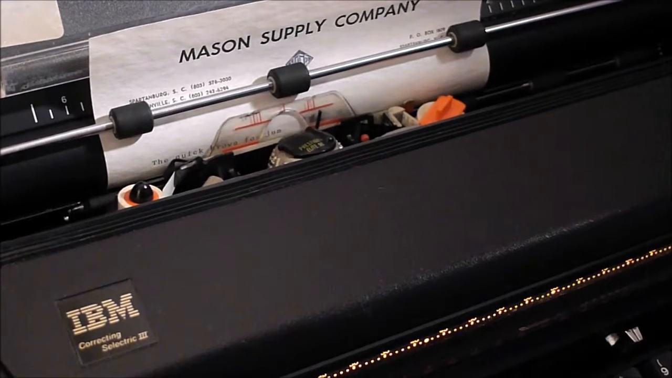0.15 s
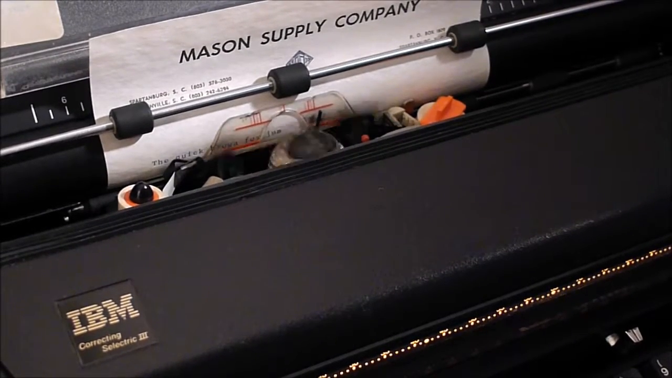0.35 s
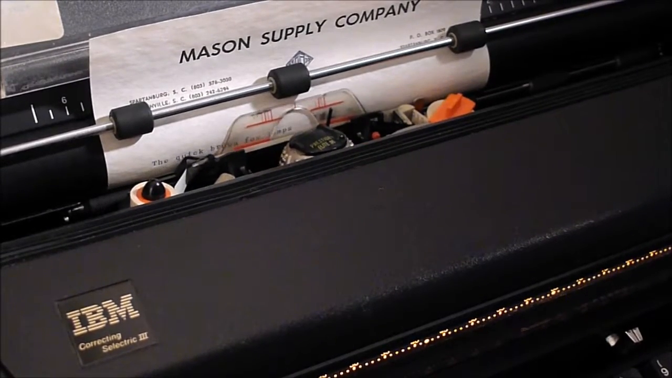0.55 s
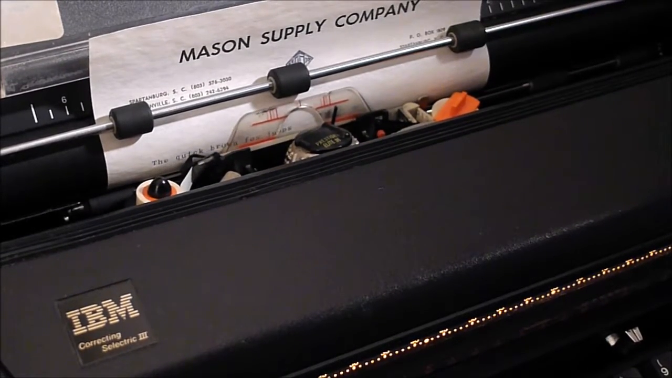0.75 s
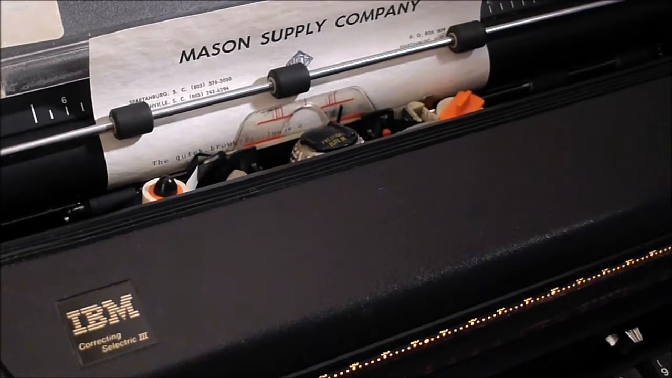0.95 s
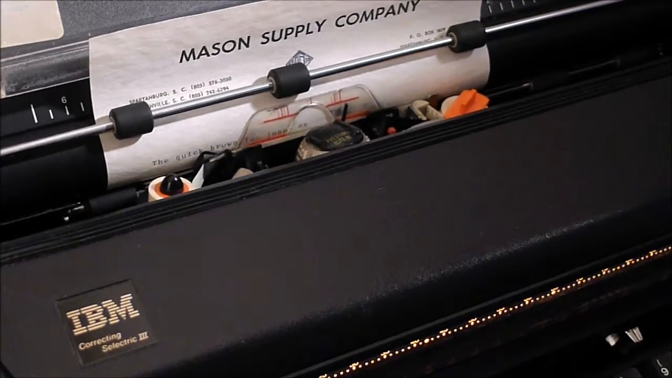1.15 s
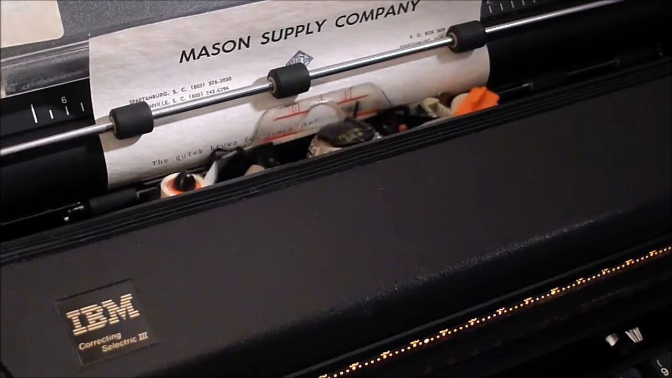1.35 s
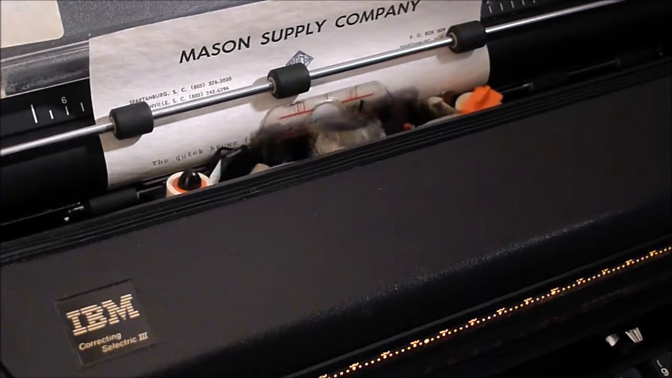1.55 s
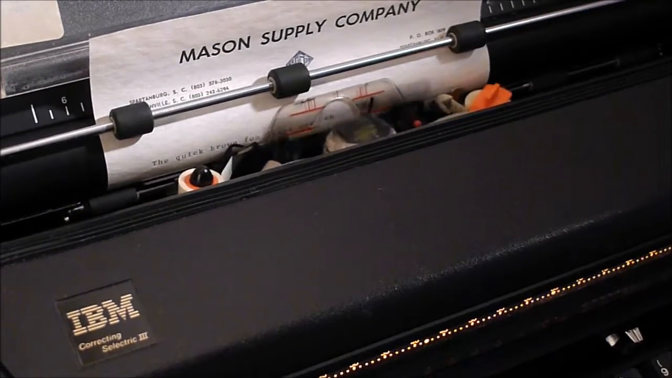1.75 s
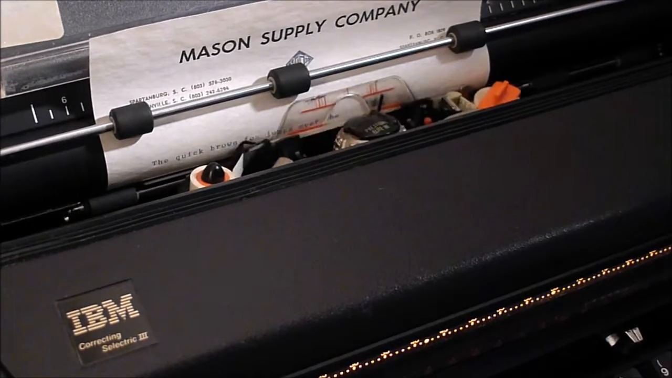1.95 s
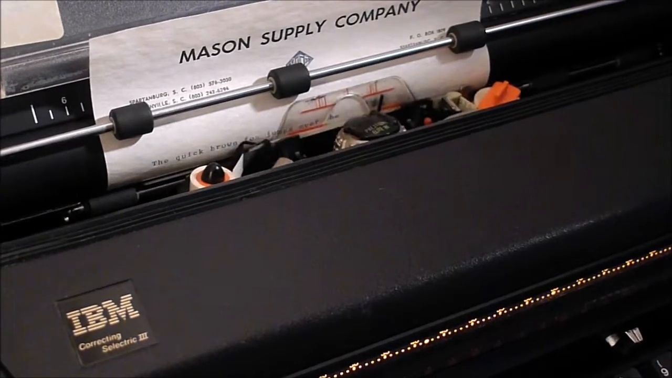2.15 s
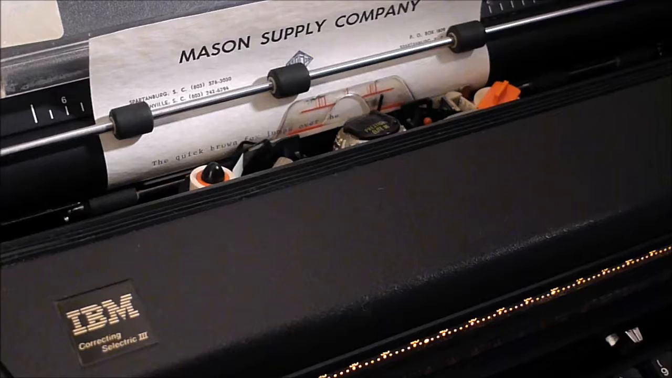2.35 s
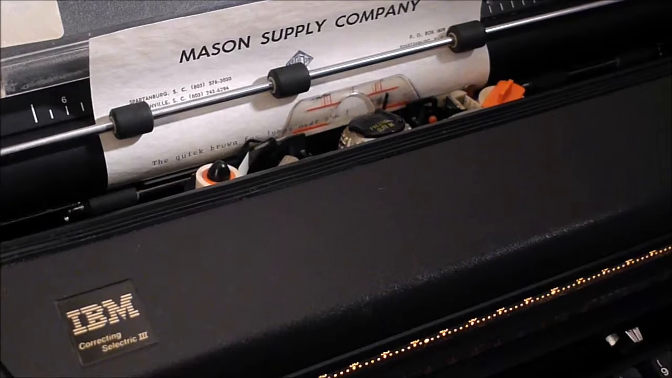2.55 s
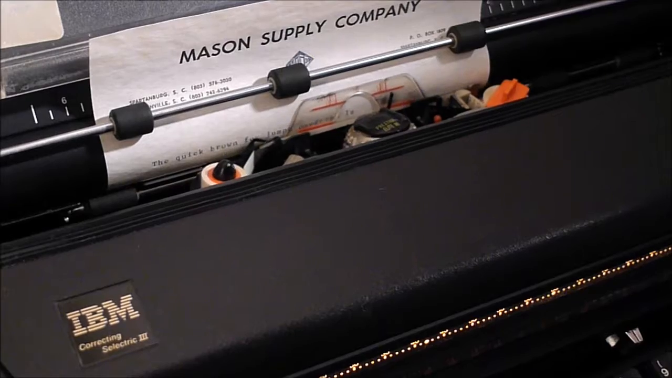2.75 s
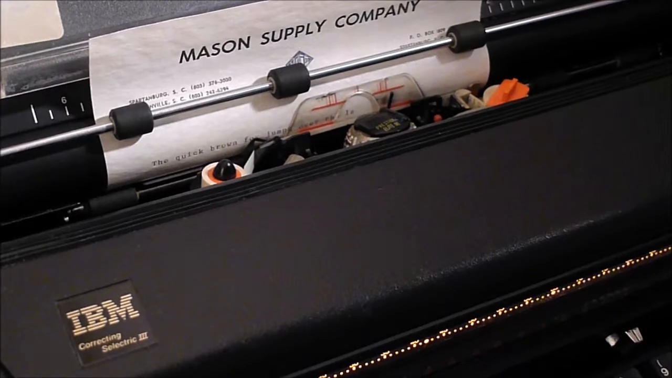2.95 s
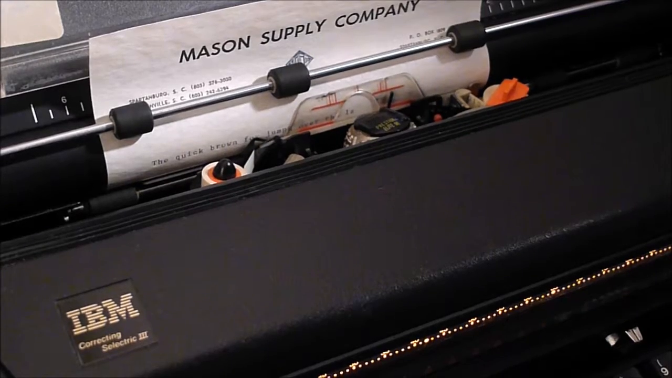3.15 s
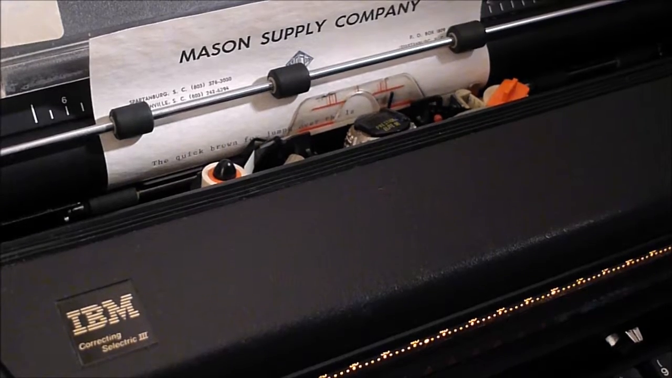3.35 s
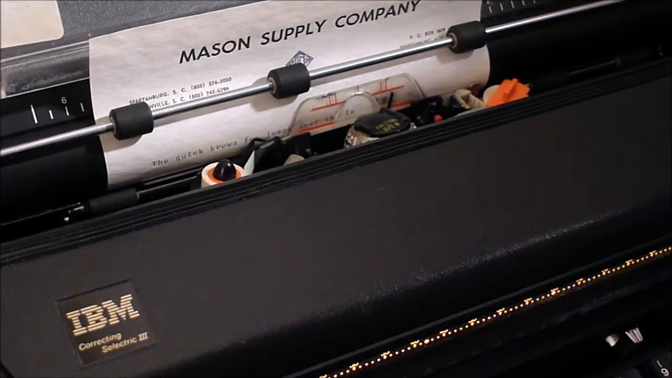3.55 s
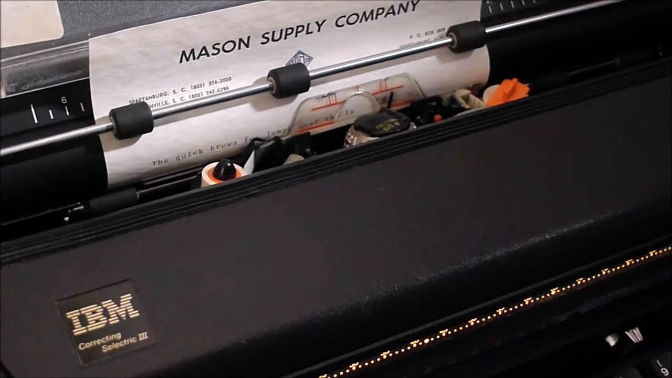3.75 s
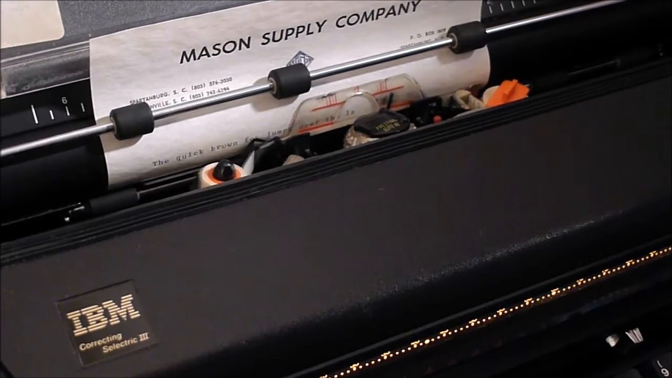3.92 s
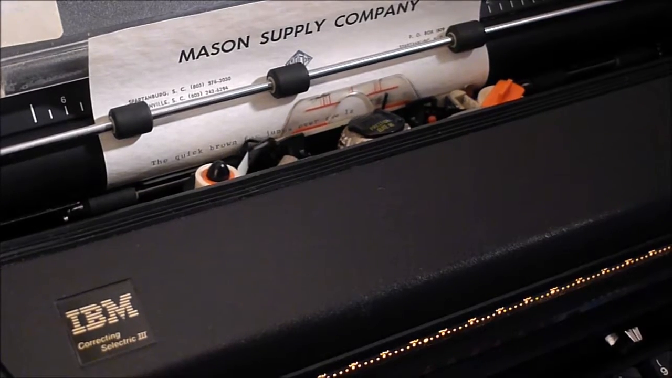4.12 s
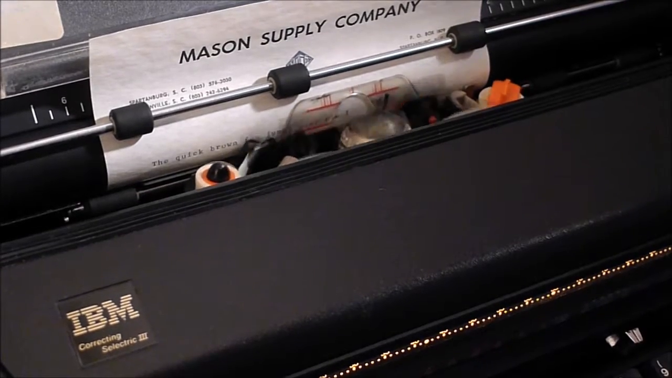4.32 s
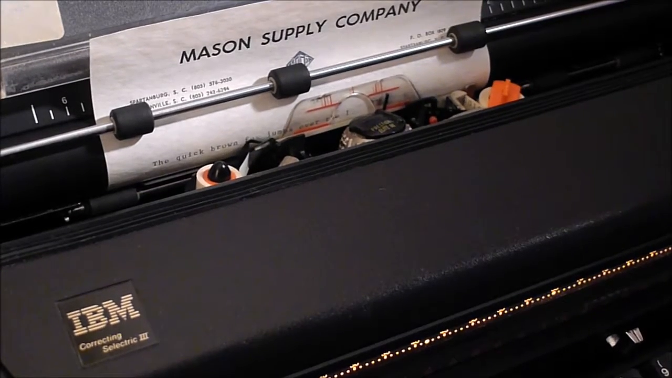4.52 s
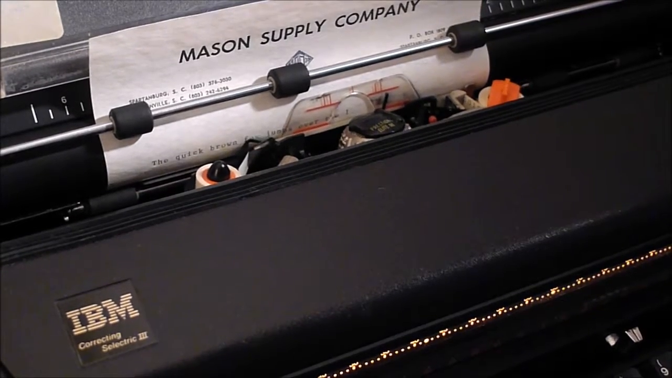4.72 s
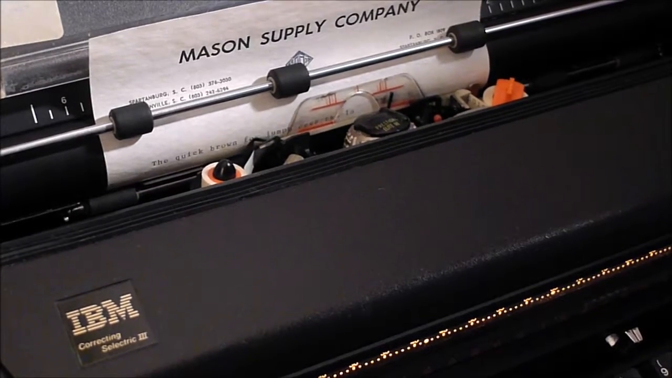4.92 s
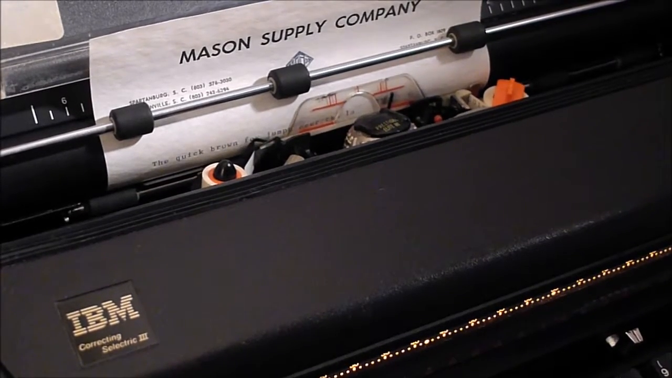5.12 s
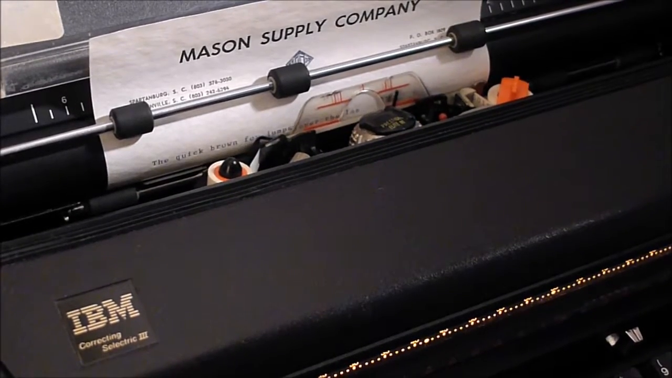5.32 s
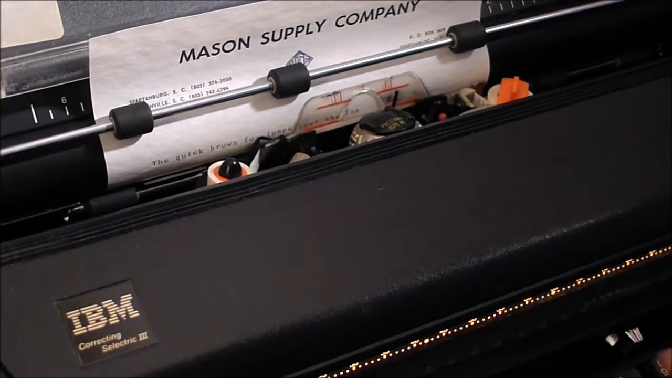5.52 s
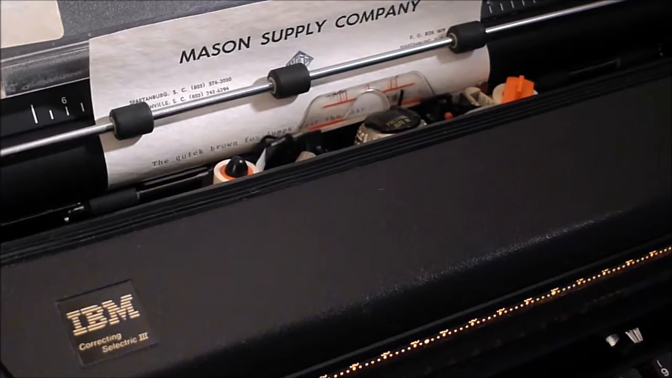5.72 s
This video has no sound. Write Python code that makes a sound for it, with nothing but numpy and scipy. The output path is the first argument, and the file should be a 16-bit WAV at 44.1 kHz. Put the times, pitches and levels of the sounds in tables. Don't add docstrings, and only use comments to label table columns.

```python
import sys
import numpy as np
from scipy import signal
from scipy.fft import rfft, irfft
from scipy.io import wavfile
from scipy.ndimage import uniform_filter1d

SR = 44100
rng = np.random.default_rng(int(sys.argv[2]) if len(sys.argv) > 2 else 0)


def elevation(decibels):
    levels = np.asarray(decibels, float)
    return 10 ** (levels / 20)


def generate_wav(sig):
    pcm = np.round(np.clip(np.atleast_2d(sig).T, -1, 1) * 32767).astype(np.int16)
    wavfile.write(sys.argv[1], SR, pcm)


N = 254898

# t/s, thump level/dB, head click level/dB, drop-back click level/dB
PRINTS = [(0.3911, -14, -16, -24), (0.4993, -19, -14, -26), (0.9076, -14, -17, -22),
          (1.0267, -17, -21, -25), (1.1996, -18, -15, -23), (1.2661, -18, -20, -24),
          (1.5791, -17, -15, -24), (1.6716, -17, -20, -25), (1.7887, -19, -17, -24),
          (2.4553, -16, -20, -25), (2.7196, -20, -18, -26), (3.9889, -22, -22, -45),
          (4.3026, -18, -17, -22), (4.8253, -13, -17, -23), (5.1935, -17, -17, -25),
          (5.6001, -14, -18, -25)]
# t/s, peak level/dB, ring f/Hz
DETENTS = [(0.3864, -20, 6030), (0.494, -23, 3100), (0.9025, -19, 6050), (1.0212, -24, 3490),
           (1.1945, -21, 3170), (1.2599, -25, 5730), (1.5744, -20, 5940), (1.6637, -25, 3080),
           (1.783, -23, 2910), (2.4475, -17, 5940), (2.7119, -18, 3010), (3.9817, -28, 4370),
           (4.2974, -18, 3120), (4.8175, -15, 3290), (5.186, -15, 3170), (5.5923, -17, 3360)]
# t/s, latch level/dB, latch ring f/Hz, lever level/dB, thump level/dB
KEYS = [
    (0.3293, -15, 4610, -30, -22),
    (0.8475, -17, 4400, -26, -27),
    (1.5188, -17.5, 4570, -44, -36),
    (2.3964, -18, 5360, -34, -29),
    (4.2537, -26, 2000, -50, -27),
    (4.7665, -25, 4970, -42, -36),
    (5.1359, -23, 8070, -44, -30),
    (5.5391, -20, 4390, -32, -33),
]


def rms_one(x):
    return x / np.sqrt(np.mean(x ** 2) + 1e-20)


def at_hz(points, hz):
    points_hz, values = np.array(points)[:, 0], np.array(points)[:, 1]
    return np.interp(np.log(hz + 1), np.log(points_hz), values)


def coloured(x, spectrum):
    gain = elevation(at_hz(spectrum, np.linspace(0, SR / 2, N // 2 + 1)))
    return irfft(rfft(x) * rms_one(gain), N)


def band(x, low_hz, high_hz):
    sos = signal.butter(2, [low_hz, high_hz], "band", fs=SR, output="sos")
    return signal.sosfilt(sos, x + 1e-18)


def drift(rate_hz):
    r = np.exp(-80 * np.pi * rate_hz / SR)
    white = rng.standard_normal(N // 40 + 2002)
    slow = signal.lfilter([1], [1, -2 * r, r * r], white)[2000:]
    return np.interp(np.arange(N) / 40, np.arange(len(slow)), rms_one(slow))


def ring(excitation, hz, t60):
    r = elevation(-60 / (t60 * SR))
    w = 2 * np.pi * hz / SR
    return signal.lfilter([0, np.sin(w)], [1, -2 * r * np.cos(w), r * r], excitation + 1e-18)


def resonance(x, hz, width_hz):
    r = np.exp(-np.pi * width_hz / SR)
    zeros = np.array([1, 0, -1]) * (1 - r * r) / 2
    return signal.lfilter(zeros, [1, -2 * r * np.cos(2 * np.pi * hz / SR), r * r], x)


def impulses(seconds, sizes):
    out = np.zeros(N)
    np.add.at(out, np.clip((np.asarray(seconds) * SR).astype(int), 0, N - 1), sizes)
    return out


def dying(seconds, sizes, t60):
    return signal.lfilter([1], [1, -elevation(-60 / (t60 * SR))], impulses(seconds, sizes) + 1e-18)


def frame(x, share_db):
    # f/Hz, width/Hz, level/dB
    frame_modes = [(431, 10.7, 8), (1170, 29, -12), (1730, 13, -35), (2120, 67, 4.5), (2700, 63, -11),
                   (3196, 470, 7.5), (4610, 51, -40), (5940, 890, -16), (7450, 60, -32), (9150, 43, -48.5)]
    out = x
    for k, (hz, width_hz, db) in enumerate(frame_modes):
        out = out + (-1) ** k * elevation(share_db + db) * resonance(x, hz, width_hz)
    return out


def contacts():
    # t/s, stop level/dB, ring f/Hz, settling delay/s
    stops = [
        (0.5994, -30, 3960, .079),
        (1.3795, -32, 4090, .078),
        (1.883, -33, 5960, .06),
        (5.6776, -36, 2800, .2),
    ]
    # t/s, peak level/dB, ring f/Hz, top part/dB
    pawls = [(0.0143, -23, 9150, -2), (0.9684, -31, 5060, -9), (1.1275, -38, 6480, -10),
             (5.749, -30, 4500, -5), (1.1509, -35, 4610, -12), (3.997, -26, 4500, -9),
             (3.878, -28, 3500, -12), (1.7295, -30, 7060, -11), (2.4218, -29, 3530, -7),
             (2.5017, -33, 2500, -9), (2.6708, -34, 4540, -5), (2.6759, -36, 2170, -4),
             (3.8556, -21, 3500, -11), (3.866, -19, 3530, -14), (3.8924, -31, 6700, -11),
             (3.9413, -34, 3170, -7), (3.9523, -21, 6160, -8), (4.0754, -44, 2000, -13),
             (4.2135, -43, 2950, -31), (4.224, -42, 5200, -4), (4.2468, -24, 7750, -4),
             (4.2661, -22, 6120, -6), (4.2855, -24, 8720, -4), (4.745, -44, 2500, -25),
             (4.7768, -26, 3400, -11), (4.795, -23, 3190, -9), (4.8087, -25, 2500, -12),
             (5.1168, -39, 2260, -29), (5.5632, -29, 5510, -6), (5.7437, -28, 3230, -9)]
    head_hz, lever_hz = 3150, 9000
    slide_s, slide_db = .0045, -28
    head_most, detent_most, latch_most, pawl_most = -29.5, -31, -30.5, -30.5
    rows = []
    for s, _, db, drop_db in PRINTS:
        rows += [(s - .030, -35.5, head_hz, -6, pawl_most),
                 (s, db, head_hz, -11, head_most),
                 (s + .0172, drop_db, head_hz, -3, detent_most),
                 (s + .0225, drop_db - 5, head_hz, -5, pawl_most)]
    for s, db, hz in DETENTS:
        before_db = min(slide_db, 2 * slide_db - 1.3 * db)
        rows += [(s - slide_s, before_db, head_hz, -5, detent_most),
                 (s, db, hz, -8, detent_most)]
    for s, db, hz, lever_db, _ in KEYS:
        rows += [(s - .0118, -40, head_hz, -8, pawl_most),
                 (s - .009, lever_db, lever_hz, -3, latch_most),
                 (s, db, hz, -12, latch_most),
                 (s + .007, -31, 4500, -5, pawl_most)]
    for s, db, hz, delay_s in stops:
        rows += [(s - slide_s, db - 6.5, 2200, -8, pawl_most),
                 (s, db, hz, -9, pawl_most),
                 (s + delay_s, db - 8, 3500, -5, pawl_most)]
    rows += [(s, db, hz, top_db, pawl_most) for s, db, hz, top_db in pawls]
    s, db, hz, top_db, most_db = np.transpose([row for row in rows if row[0] < N / SR])
    return s, db, hz, top_db, np.minimum(-4.5, most_db - db)


def clicks():
    # f/Hz, level/dB, t60/s
    springs = [(10200, -36, .1), (11670, -33, .12), (13060, -32, .28), (13150, -30, .1), (14600, -29, .06)]
    crack_db, ring_db, rasp_db = -3.5, 1.5, 0.5
    s, db, hz, top_db, after_db = contacts()
    db = db - .35 * np.maximum(after_db + 14, 0)
    length = 700
    after = np.arange(length) / SR
    rise = 1 - np.exp(-after / .0002)
    crackle = rng.standard_normal((len(s), length)) * elevation(-60 * after / .008) * rise
    crackle /= np.sqrt(np.mean(crackle[:, :90] ** 2, axis=1, keepdims=True))
    phase = 2 * np.pi * hz[:, None] * after
    tone = (np.sin(phase) + .35 * np.sin(1.96 * phase)) * elevation(-60 * after / .012) * rise
    middle, top, rung, jolt = np.zeros((4, N + length))
    for k, start in enumerate((s * SR).astype(int)):
        span = slice(start, start + length)
        middle[span] += elevation(db[k] + crack_db) * crackle[k]
        top[span] += elevation(db[k] + top_db[k]) * crackle[k]
        jolt[span] += elevation(db[k] + 2 * top_db[k]) * crackle[k]
        rung[span] += elevation(db[k] + ring_db) * tone[k]
        rung[span] += elevation(db[k] + rasp_db) * resonance(crackle[k], hz[k], 1300)
    cracks = band(middle, 2600, 8000) + band(top, 8000, 13000)
    steel = sum(elevation(level_db - 5.5) * ring(jolt, f, t60) for f, level_db, t60 in springs)
    return frame(cracks[:N], share_db=-11.5), (rung + steel)[:N]


def blows():
    thumps = [(row[0], row[1]) for row in PRINTS]
    rebounds = [(row[0] + .027, -41.5) for row in PRINTS]
    latches = [(row[0], row[-1]) for row in KEYS]
    return np.transpose(thumps + rebounds + latches)


def strikes():
    # f/Hz, level/dB, t60/s
    case_modes = [(74.3, -18.5, 0.27), (134.9, -16, 1), (172, -10.5, 0.17), (374, 3, 0.04),
                  (505, 4.5, 0.023), (750, -42.5, 0.021), (1056, 10, 0.01), (1252, 11.5, 0.012)]
    # t/s, peak level/dB, dull part/dB
    knocks = [(0.01, -33, -20), (0.602, -32, -8.5), (1.151, -39, -21), (1.383, -34, -13), (1.519, -59, -23),
              (1.884, -37.5, -8.5), (2.673, -42, -23), (3.853, -44, 3), (4.071, -53, 0), (4.213, -45, -11),
              (4.764, -35, -30), (5.116, -42, -23), (5.742, -31.5, -14)]
    # t/s, level/dB
    bar_rings = [
        (3.991, -29),
        (4.067, -41),
    ]
    s, db = blows()
    scatter_db = rng.normal(0, 2, (len(s), len(case_modes)))
    hits = impulses(s, elevation(db)) - .6 * impulses(s + .0011, elevation(db))
    slap = signal.lfilter(np.r_[np.ones(9), -np.ones(9)] / 9, [1], hits)
    out = 8 * band(slap, 500, 2500) + 14 * band(hits, 300, 1400)
    bar_s, bar_db = np.transpose(bar_rings)
    out += ring(impulses(bar_s, elevation(bar_db)), 1420, 0.054)
    knock_s, knock_db, dull_db = np.transpose(knocks)
    white = rng.standard_normal((2, N))
    out += band(white[0] * dying(knock_s, elevation(knock_db + 7.5), 0.14), 220, 1700)
    out += band(white[1] * dying(knock_s, elevation(knock_db + dull_db + 17), 0.29), 97, 520)
    for k, (hz, level_db, t60) in enumerate(case_modes):
        push = np.hanning(int(1.5 * SR / hz))
        push *= np.cos(2 * np.pi * hz * np.arange(len(push)) / SR) / push.sum()
        pushes = impulses(s, elevation(db + level_db - 9 + scatter_db[:, k]))
        out += ring(signal.fftconvolve(pushes, push)[:N], hz, t60)
    return out


def cycle():
    s = np.transpose(PRINTS)[0]
    loss = elevation(-60 / (0.028 * SR))
    size = elevation(-41.5 + .7 * (np.transpose(DETENTS)[1] + 19.5))
    turning = np.cumsum(impulses(s - .051, size) - impulses(s + .036, size))
    eased = signal.lfilter([1 - loss], [1, -loss], turning + 1e-18)
    return elevation(0.6 * drift(46)) * np.maximum(turning, eased)


def linkage():
    # f/Hz, level/dB per Hz
    metal = [(88, -30), (150, -8), (321, -2.5), (368, -5), (448, -6.5), (545, -3), (1190, -4.5),
             (2180, -6.5), (3160, 1.5), (3920, -4), (6020, -5), (13400, -21), (16000, -15)]
    s, db, _, top_db, after_db = contacts()
    coast = dying(np.transpose(PRINTS)[0], elevation(-54.5), 0.6)
    coast += dying([0], elevation(-35), 0.55)
    coast += dying([3.857], elevation(-42), .3)
    stirred_power = dying(s + 0.0012, elevation(2 * (db + after_db) - 13), 0.05)
    effort = coast + cycle() + np.sqrt(stirred_power)
    bright_power = dying(s + 0.0014, elevation(2 * (db + after_db + top_db) - 1.5), 0.048)
    sheen = np.sqrt(bright_power)
    sizes = elevation(2 * np.minimum(rng.exponential(1, N), 4)) * rng.choice([-1, 1], N)
    sparse = sizes * (rng.random(N) < 9000 / SR)
    grains = rms_one(sparse) * elevation(1.5 * drift(90))
    body = rms_one(frame(coloured(grains, metal), share_db=-3.5))
    return effort * body + sheen * rms_one(band(body, 7720, 15100))


def idle_clutch():
    # t/s, level/dB
    ticks = [(2.0564, -66), (2.1253, -59), (2.1594, -61), (2.1941, -58), (2.262, -62), (2.297, -58),
             (3.0259, -70), (3.06, -59), (3.3002, -58.5), (3.3345, -68), (3.3686, -60), (3.404, -62),
             (3.4614, -64), (3.6088, -68), (3.6428, -63), (3.677, -70), (5.004, -56), (5.0381, -64),
             (5.0591, -56)]
    # f/Hz, level/dB, t60/s
    tick_modes = [(10100, 0, .02), (10330, -4, .06), (10580, -6, .08), (7900, -6, .02)]
    s, db = np.transpose(ticks)
    envelope = sum(.65 ** k * dying(s + k * .011, elevation(db), .014 + .012 * k) for k in range(3))
    scratch = rng.standard_normal(N) * envelope
    rings = sum(elevation(level_db - 21.5) * ring(scratch, hz, t60) for hz, level_db, t60 in tick_modes)
    return rings + 1.2 * band(scratch, 6800, 14000)


def motor():
    orders = [5, 6, 7, 8, 10, 12, 16, 24, 32]
    order_levels = [-10.5, -20, -18, -7, -20.5, -23.5, -17.5, -25, -34]
    # f/Hz, width/Hz,
    # level/dB re hum
    whines = [(117, 6, -17), (834, 6, -25), (1244, 25, -30), (1960, 120, -25), (15700, 90, -40)]
    # f/Hz, level/dB per Hz
    air = [(25, -1.5), (60, -0.5), (95, -5), (170, -24), (300, 7), (400, -5.5), (600, -6), (1100, -10),
           (2500, -19.5), (6000, -25), (11000, -29.5), (16000, -34)]
    hum_hz, shaft_hz = 120, 29.18
    hum = np.sin(2 * np.pi * hum_hz * np.arange(N) / SR)
    out = np.sqrt(2) * elevation(1.7 * drift(14)) * hum
    turn = 2 * np.pi * np.cumsum(shaft_hz * (1 + .0025 * drift(2))) / SR
    for order, db in zip(orders, order_levels):
        tone = np.sin(order * turn + rng.uniform(0, 2 * np.pi))
        out += np.sqrt(2) * elevation(db + 4 * drift(9)) * tone
    for hz, width_hz, db in whines:
        white = rng.standard_normal(N)
        out += elevation(db) * rms_one(resonance(resonance(white, hz, width_hz), hz, width_hz))
    return out + elevation(-10 + 0.7 * drift(24)) * coloured(rng.standard_normal(N), air)


def hum_level():
    s = np.r_[0, np.transpose(PRINTS)[0]]
    duck_db = np.r_[4.5, np.full(len(PRINTS), 1.82)]
    recovery_s = 1.19
    return -47 - uniform_filter1d(dying(s, duck_db, np.log(1000) * recovery_s), size=2000)


def room(x):
    # f/Hz, t60/s
    reverberation = [(200, 1), (530, 0.52), (1400, 0.73), (3700, 0.72), (9700, 0.52), (15000, 0.36)]
    t = np.arange(SR) / SR
    tail = np.zeros(SR)
    edges = 60 * 2 ** np.arange(0, 8.6, .5)
    for low, high in zip(edges, np.minimum(edges[1:], .45 * SR)):
        t60 = at_hz(reverberation, np.sqrt(low * high))
        tail += band(rng.standard_normal(SR), low, high) * elevation(-60 * t / t60)
    tail *= 1 - np.exp(-t / 0.006)
    return signal.fftconvolve(x, tail / np.sqrt(np.sum(tail ** 2)))[:N]


def scene():
    cracks, rings = clicks()
    typing = cracks + linkage() + strikes() + idle_clutch()
    wet = room(typing + .3 * rings)
    mix = typing + rings + elevation(-10.5) * wet + elevation(hum_level()) * motor()
    return mix[None]


def low_pass(x):
    return signal.sosfilt(signal.butter(12, 16790, fs=SR, output="sos"), x)


def record(dry):
    x = signal.sosfilt(signal.butter(1, 45, "high", fs=SR, output="sos"), dry)
    x = x - .8 * resonance(x, 7420, 330)
    x = .6 * np.tanh(x / .6)
    above_hz = np.linspace(0, SR / 2, N // 2 + 1) - 15800
    shelf = np.where(above_hz < 0, 1, elevation(-22 - above_hz / 50))
    finished = irfft(rfft(x) * uniform_filter1d(shelf, size=1200), N)
    return low_pass(finished)


dry = scene()
out = record(dry)
generate_wav(out)
```